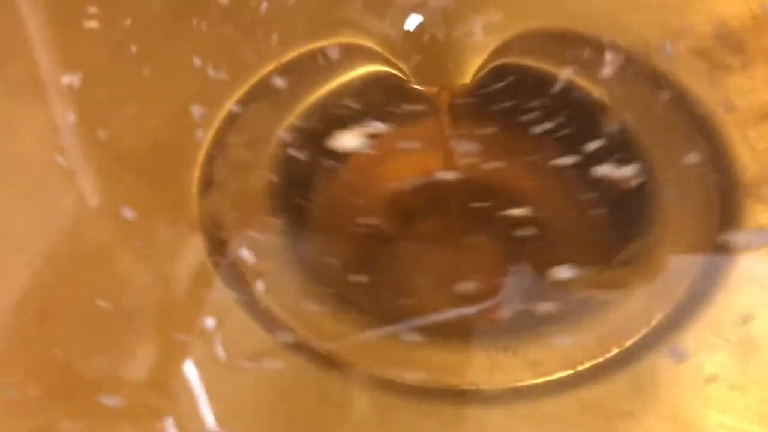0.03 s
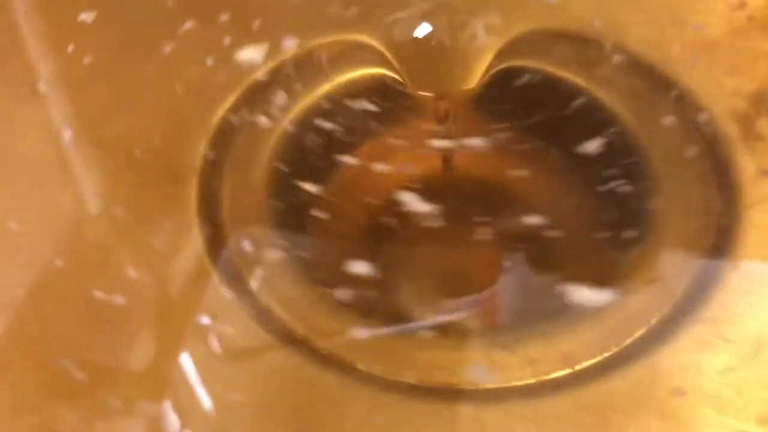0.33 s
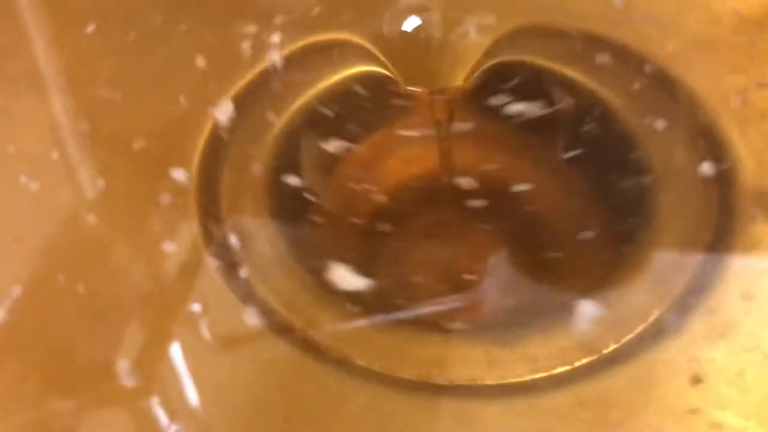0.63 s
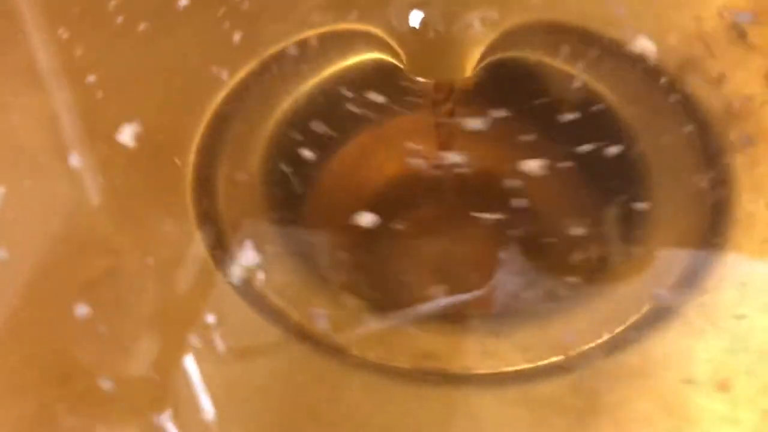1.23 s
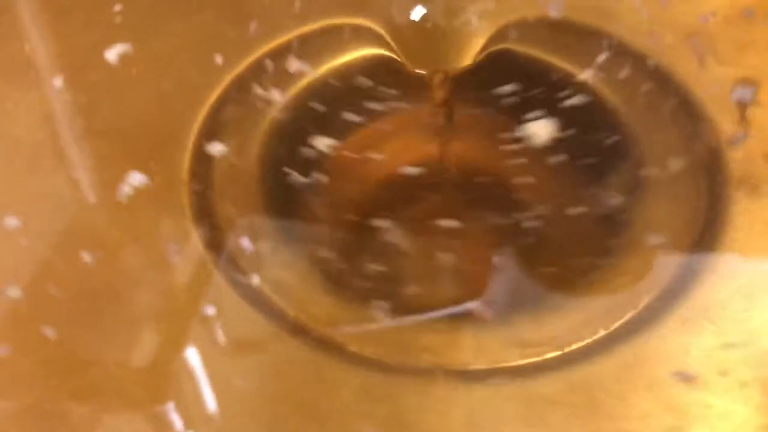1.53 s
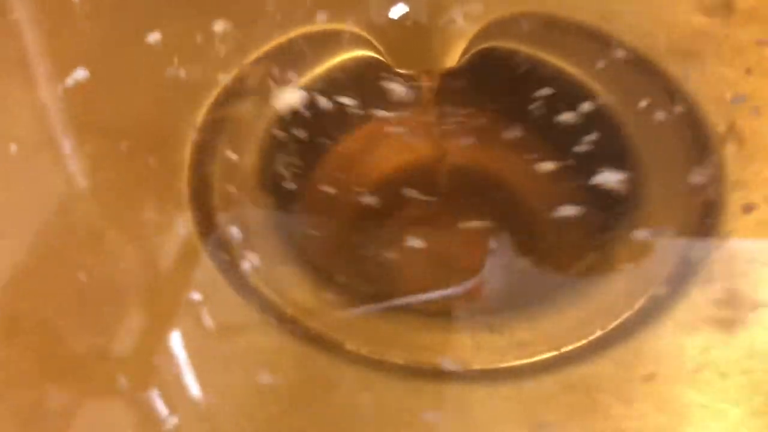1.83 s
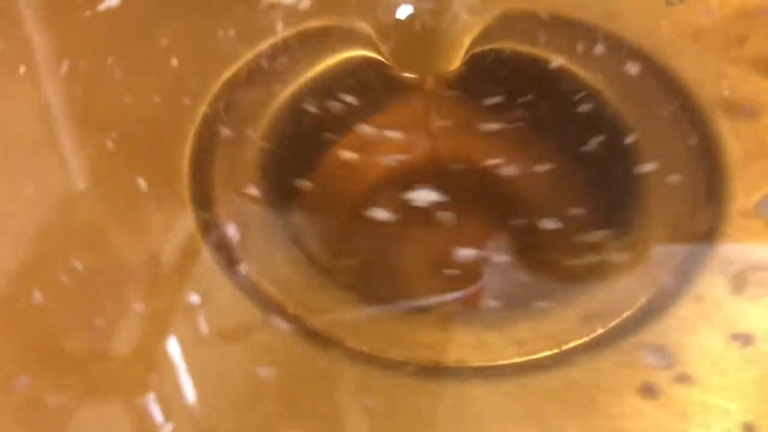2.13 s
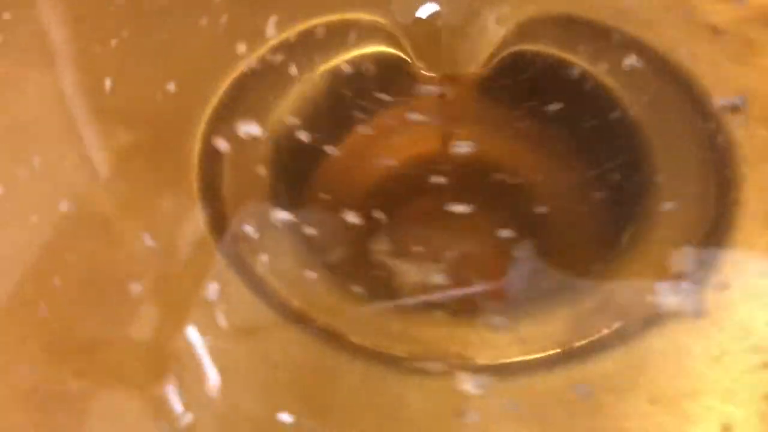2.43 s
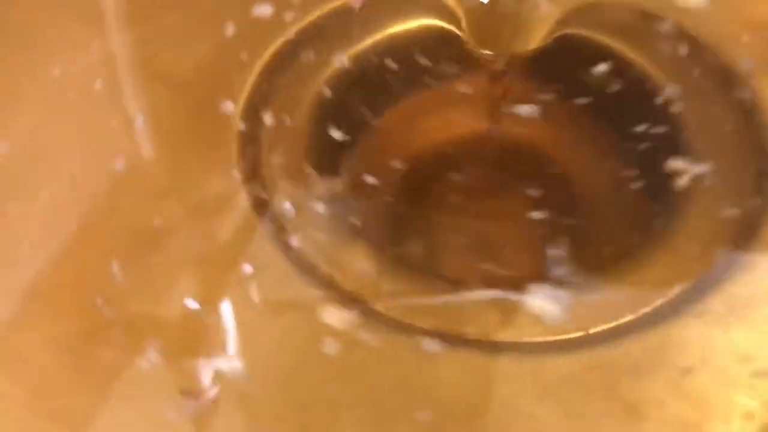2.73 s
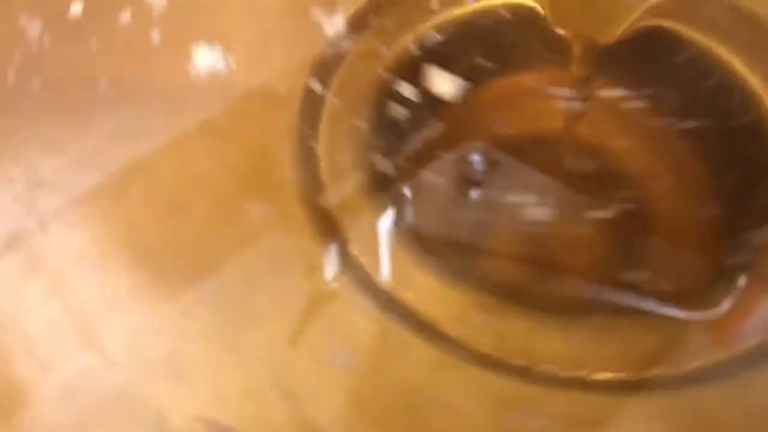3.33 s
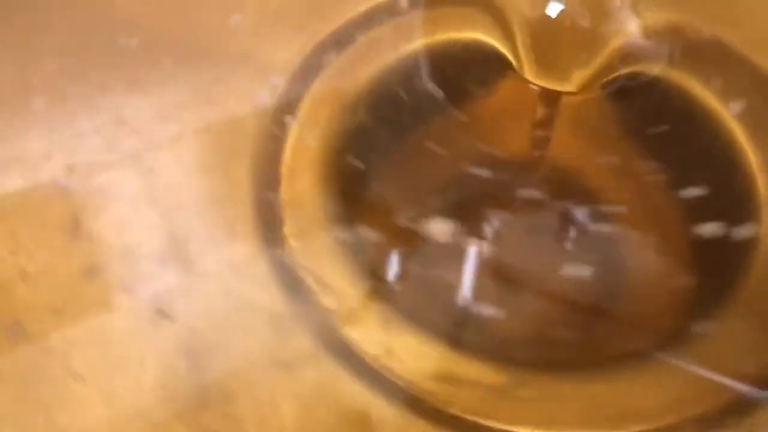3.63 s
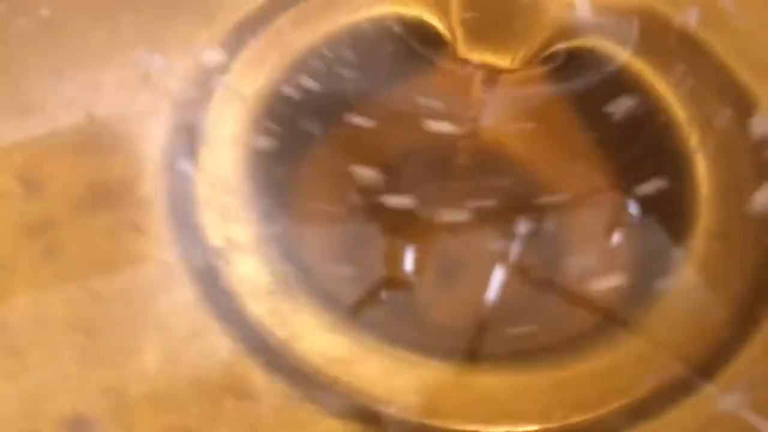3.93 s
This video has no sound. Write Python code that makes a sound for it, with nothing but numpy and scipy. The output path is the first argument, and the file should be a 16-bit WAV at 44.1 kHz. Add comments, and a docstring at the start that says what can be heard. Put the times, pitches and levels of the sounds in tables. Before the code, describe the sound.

Close to the microphone, water gurgles and hisses as it whirls down a sink drain over a low, pulsing hum and rumble. Bubbles blip, glug and sizzle, with two sharp pops in the second half and quick reflections from the basin.

```python
"""A swelling hum, a gurgle and a fizzing rush: water swirls down a basin's drain, close up in mono.
The air in the drain pipe hums over a low rumble, and collapsing air pockets ring the whirlpool's throat.
Bits of foam sizzle, single bubbles blip and glug, rising in pitch as they die,
and in the second half two bubbles snap sharply. The basin's walls add quick reflections."""
import sys
import numpy as np
from scipy import signal
from scipy.fft import rfft, irfft
from scipy.io import wavfile
from scipy.ndimage import uniform_filter1d

SR = 44100
rng = np.random.default_rng(int(sys.argv[2]) if len(sys.argv) > 2 else 0)


def inscribe(sig):
    """Save sig as 16-bit PCM at rate SR to the path in sys.argv[1].

    A 1-D sig is mono; a 2-D sig holds one channel per row.
    Samples are clipped to [-1, 1] before scaling.
    """
    pcm = np.round(np.clip(np.atleast_2d(sig).T, -1, 1) * 32767)
    wavfile.write(sys.argv[1], SR, pcm.astype(np.int16))


N = 176400
T = np.arange(N) / SR
HZ = np.maximum(np.fft.rfftfreq(N, 1 / SR), 1)


def from_db(db):
    """Decibels to gain."""
    return 10 ** (np.asarray(db) / 20)


def rms_one(x):
    """Scale to unit rms."""
    return x / np.sqrt(np.mean(x ** 2) + 1e-20)


def fader(points):
    """A level ride: straight lines between (t/s, level/dB) points, in dB at every sample."""
    return np.interp(T, *np.transpose(points))


def eq_curve(points):
    """Join (f/Hz, level/dB) points on a log-frequency axis, in dB at every bin."""
    hz, db = np.transpose(points)
    return np.interp(np.log(HZ), np.log(hz), db)


def shaped(x, gain):
    """Filter by a gain per frequency, then scale to unit rms."""
    return rms_one(irfft(rfft(x) * gain, N))


def drift(rate_hz):
    """A slow random wander of unit rms."""
    return shaped(rng.standard_normal(N), 1 / (1 + (HZ / rate_hz) ** 2))


def resonance(hz, width):
    """Response of one resonance, 1 at its peak."""
    return 1 / (1 + 1j * (HZ ** 2 - hz ** 2) / (HZ * width))


def grains(per_s, spread_db):
    """Random clicks of uneven size."""
    sizes = from_db(spread_db * np.minimum(rng.exponential(1, N), 4))
    return sizes * rng.choice([-1, 1], N) * (rng.random(N) < per_s / SR)


def cavity(modes, per_s, even, smooth_s):
    """Collapsing air pockets ring a cavity's modes; `even` (0 to 1) compresses the level."""
    ring = 0
    for hz, width, db in modes:
        ring += from_db(db) * shaped(grains(per_s, spread_db=2.5), resonance(hz, 1.48 * width) ** 2)
    power = uniform_filter1d(np.abs(signal.hilbert(ring)) ** 2, int(smooth_s * SR))
    return rms_one(ring / (power + 1e-3) ** (even / 2))


def basin(x, wet_db=3.5, t60_s=0.11):
    """Add quick, dense reflections from the walls of the basin."""
    t = T[:SR // 4]
    tail = rng.standard_normal(len(t)) * from_db(-60 * t / t60_s) * (t > .0015)
    return x + from_db(wet_db) * signal.fftconvolve(x, tail / np.linalg.norm(tail))[:N]


# swells of the pipe's hum: t/s, relative level/dB
HUM_LEVEL = [(0.0, -34), (0.07, -43.5), (0.37, -31.5), (0.41, -43), (0.46, -34.5), (0.53, -36), (0.57, -53),
             (0.71, -39), (0.73, -53.5), (0.96, -36), (1.01, -40), (1.15, -38.5), (1.34, -45), (1.38, -34),
             (1.5, -49), (1.57, -36), (1.69, -48), (1.77, -36.5), (1.83, -47), (1.87, -33), (2.13, -40),
             (2.15, -51), (2.23, -34.5), (2.26, -46), (2.35, -32), (2.43, -47), (2.46, -34), (2.49, -43),
             (2.54, -31), (2.61, -43.5), (2.73, -32.5), (2.87, -48.5), (2.96, -29), (3.03, -37),
             (3.05, -45.5), (3.29, -31), (3.35, -54), (3.43, -32), (3.53, -56), (3.55, -40), (3.69, -40.5),
             (3.75, -34.5), (3.97, -42), (4.0, -50)]
# weaker air resonances of the pipe: f/Hz, nominal width/Hz, relative level/dB
PIPE_MODES = [(304.8, 22.4, 0), (203.2, 35, -3)]
# spectrum of the falling water's rumble: f/Hz, relative level/dB
RUMBLE_EQ = [(20, -33), (40, -16), (52, -11), (64, 2), (85, -2), (110, 0), (125, -3), (145, 1.5), (160, -7),
             (175, 2), (200, -2.5), (225, -5.5), (260, -3), (320, -5.5), (345, -19), (380, -15.5),
             (430, -14), (480, -13.5), (520, -15), (570, -12), (620, -22), (700, -10.5), (1000, -32),
             (2000, -37)]

def pipe():
    """The air column hums on one wavering note; weaker resonances swell with it over a steady rumble."""
    level_db = fader(HUM_LEVEL)
    pitch_hz = 258.2 + 3.58 * drift(12.7)
    hum = from_db(level_db - 1) * np.sqrt(2) * np.sin(2 * np.pi * np.cumsum(pitch_hz) / SR)
    hollow_db = -46 + 0.66 * (level_db - level_db.mean())
    hollow = from_db(hollow_db) * cavity(PIPE_MODES, per_s=900, even=0.25, smooth_s=0.012)
    rumble = from_db(-41) * shaped(rng.standard_normal(N), from_db(eq_curve(RUMBLE_EQ)))
    return hum + hollow + rumble


# level rides of the throat, the rim and the drain's low ring: t/s, relative level/dB
THROAT_LEVEL = [(0.0, -46.5), (0.3, -43.5), (0.32, -37.5), (0.4, -41.5), (0.43, -33), (0.54, -39),
                (0.79, -43.5), (0.8, -37.5), (1.31, -39.5), (1.34, -49), (1.37, -31.5), (1.55, -43),
                (1.67, -43), (1.7, -35.5), (1.8, -40.5), (1.92, -38.5), (1.99, -45), (2.26, -38.5),
                (2.29, -47), (2.33, -39.5), (2.66, -44.5), (2.74, -34.5), (2.76, -46.5), (2.83, -30),
                (2.88, -41), (3.07, -39), (3.11, -52), (3.14, -36.5), (3.16, -46.5), (3.25, -35.5),
                (3.32, -48), (3.5, -42), (3.53, -48), (3.7, -37), (3.74, -44.5), (4.0, -48)]
SLOSH_LEVEL = [(0.0, -43), (0.1, -46), (0.6, -52), (0.62, -58.5), (1.57, -43.5), (1.64, -50.5),
               (2.12, -44.5), (2.17, -44), (2.24, -48.5), (3.5, -44.5), (3.59, -53), (3.9, -39.5),
               (3.92, -47), (4.0, -47)]
LOW_RING_LEVEL = [(0.0, -52), (0.41, -49.5), (0.44, -39), (0.47, -53.5), (2.39, -60), (2.73, -49.5),
                  (2.87, -71), (2.94, -56), (4.0, -58.5)]
# resonances of the throat and the rim: f/Hz, nominal width/Hz, relative level/dB
THROAT_MODES = [(714, 45, -15.5), (788, 31, -8.5), (843.2, 40, 1.5), (927.5, 57, -5.5)]
SLOSH_MODES = [(1087, 36, -4.5), (1185, 45, -2.5), (1314, 114, -1.5), (1475, 25, -7), (1692, 53, -6),
               (1816, 110, -6)]

def gurgle():
    """Small glugs ring the whirlpool's throat and the drain below it; water sloshes around the rim."""
    throat = cavity(THROAT_MODES, per_s=500, even=0.29, smooth_s=0.047)
    slosh = cavity(SLOSH_MODES, per_s=650, even=0.23, smooth_s=0.094)
    low_ring = cavity([(481, 39, 0)], per_s=500, even=0.26, smooth_s=0.059)
    return (from_db(fader(THROAT_LEVEL) - 0.5) * throat
            + from_db(fader(SLOSH_LEVEL) - 1.5) * slosh
            + from_db(fader(LOW_RING_LEVEL) - 1) * low_ring)


# level ride of the rushing water: t/s, relative level/dB
RUSH_LEVEL = [(0.0, -42.5), (1.12, -43.5), (1.4, -45), (1.8, -43), (2.07, -44.5), (2.61, -43.5),
              (3.05, -43.5), (3.17, -42), (3.35, -43.5), (4.0, -44)]
# broad tone of the rush: f/Hz, relative level/dB
RUSH_EQ = [(400, -30), (700, -10), (1100, -2.5), (1450, -6), (1550, -7), (1750, -5.5), (2100, -2),
           (2400, -4), (3400, -0.5), (4200, -4.5), (6000, -5.5), (8500, -11), (10000, -13), (12500, -15.5),
           (16000, -15)]
# resonances of the basin's hollow: f/Hz, width/Hz, boost/dB
BASIN_MODES = [(1240, 67, 7), (1466, 14.4, 14.5), (1670, 40, 3.5), (2132, 22, 7), (2250, 48, 6.5),
               (2765, 14, 15.5), (3104, 15, 8.5), (3560, 260, 3.5), (4470, 170, 4.5), (5420, 280, 0),
               (8150, 250, 2.5), (11300, 570, 1)]

def rush(fizz_per_s=1800, flutter_db=1.85):
    """Swirling water: equal parts fluttering hiss and fizz of tiny bubbles, coloured by the basin."""
    hiss, fizz = 0, 0
    shared_drift = drift(6.5)
    bands_hz = np.geomspace(900, 15000, 15)
    for hz in bands_hz:
        gain = np.sqrt(hz) * from_db(flutter_db * (0.33 * shared_drift + drift(5.3)))
        hiss += gain * shaped(rng.standard_normal(N), resonance(hz, 0.42 * hz) ** 2)
        pops = grains(fizz_per_s / len(bands_hz), spread_db=4.0)
        fizz += gain * shaped(pops, resonance(hz, 0.11 * hz))
    water = rms_one(hiss) + rms_one(basin(fizz))
    boost_db = sum(db * np.abs(resonance(hz, width)) ** 2 for hz, width, db in BASIN_MODES)
    return from_db(fader(RUSH_LEVEL) + 1) * shaped(water, from_db(eq_curve(RUSH_EQ) + boost_db))


def plinks(per_s=130, low_hz=2008, high_hz=11060):
    """Faint bubbles born at random in the swirl, as rows of t/s, f/Hz, level/dB."""
    when, height, size_rank = rng.random((int(per_s * N / SR), 3)).T
    octaves = height * np.log2(high_hz / low_hz)
    db = -46 + 0.5 * octaves - 3 * np.log(np.maximum(size_rank, .04))   # a few stand out
    return np.transpose([when * N / SR, low_hz * 2 ** octaves, db])


# sizzles of bursting foam: t/s, length/s, f/Hz, relative level/dB
SIZZLES = [(.01, .03, 7700, -46), (0.103, 0.028, 8300, -44), (0.108, .03, 13800, -48),
           (0.228, .07, 2850, -41), (0.273, 0.03, 8400, -40.5), (0.271, 0.014, 11400, -44),
           (0.457, 0.043, 8700, -47), (0.579, 0.018, 9500, -47), (.806, .022, 10950, -40),
           (0.809, 0.017, 8240, -38), (0.911, 0.014, 8300, -42.5), (1.48, .017, 11300, -44.5),
           (1.481, 0.013, 8400, -42), (1.588, 0.032, 7600, -46.5), (1.85, 0.014, 12500, -52),
           (2.19, 0.082, 4700, -45.5), (3.075, 0.034, 6360, -43), (3.732, 0.041, 7950, -45),
           (3.743, .03, 12900, -48), (3.842, .075, 1650, -40)]

def sizzles(pops_per_s=1300, q=23, attack_s=0.0012, decay_s=0.0017):
    """Patches of foam burst in short showers of tiny ringing bubbles of similar size."""
    out, t = np.zeros(N + SR), T[:SR // 10]
    for onset, length, hz, db in SIZZLES:
        shower = 0
        pitches = hz * np.exp(.06 * np.linspace(-1, 1, 5))
        for pitch in pitches:
            pops = rng.standard_normal(len(t)) * (rng.random(len(t)) < pops_per_s / len(pitches) / SR)
            shower += signal.lfilter(*signal.iirpeak(pitch, q, fs=SR), pops + 1e-18)
        envelope = np.clip(t / attack_s, 0, 1) * np.exp(-np.maximum(t - length, 0) / decay_s)
        start = int(onset * SR)
        out[start:start + len(t)] += from_db(db - 4) * envelope * rms_one(shower)
    return out[:N]


# bright single bubbles, and deeper glugs in the throat: t/s, starting f/Hz, relative level/dB
BLIPS = [(.224, 2290, -25.5), (.274, 3220, -22), (.32, 5250, -37), (1.211, 2870, -26), (1.331, 2000, -25),
         (1.713, 5330, -27), (1.797, 2080, -25.5), (1.832, 2960, -31), (1.886, 5560, -27),
         (2.136, 2300, -31.5), (2.168, 1190, -31.5), (2.298, 2700, -18.5), (2.299, 2300, -27),
         (2.628, 3360, -25), (2.664, 2110, -32), (2.688, 2100, -29), (2.70, 3110, -22), (2.793, 3850, -27),
         (3.116, 2040, -29), (3.18, 5200, -27), (3.304, 2170, -30), (3.357, 2100, -28),
         (3.428, 2060, -30.5), (3.548, 1940, -30), (3.603, 3330, -26.5), (3.718, 2100, -28.5),
         (3.732, 4670, -22.5), (3.751, 2030, -24), (3.836, 1900, -27), (3.9, 1700, -41)]
GLUGS = [(.318, 840, -44), (.425, 800, -28), (.803, 897, -30), (.925, 874, -27), (1.10, 925, -27),
         (1.370, 886, -19.5), (1.699, 830, -25), (1.726, 800, -28), (2.812, 816, -39), (3.137, 845, -43),
         (3.235, 850, -32)]

def bubbles(rows, cycles, chirp, attack_s):
    """Each bubble rings and bends up in pitch, fading by 60 dB over about `cycles` periods."""
    out, t = np.zeros(N + SR), T[:SR // 10]
    for onset, hz, db in rows:
        start, t60 = int(onset * SR), cycles / hz
        envelope = (1 - np.exp(-t / attack_s)) * from_db(db - 60 * t / t60)
        out[start:start + len(t)] += envelope * np.sin(2 * np.pi * hz * t * (1 + chirp * t / t60))
    return out[:N]


# bubbles that snap sharply: t/s, relative level/dB
SNAPS = [(2.4426, -14.5), (2.7305, -22.5)]
# modes of a snap: f/Hz, relative level/dB, t60/s
SNAP_MODES = [(1700, -13, .006), (2680, -5.5, 0.011), (3560, -2, 0.015), (4330, -4, 0.0036),
              (5140, -5, 0.0088), (6300, -4.5, 0.0046), (8850, -4.5, 0.0028), (11200, -13, 0.0028),
              (14000, -20, .0015)]

def snaps(low_cut_hz=1200):
    """A bubble bursts hard at the surface: a bright crack with almost no ring."""
    out = 0
    for onset, snap_db in SNAPS:
        t = np.clip(T - onset, 0, .1)
        for k, (hz, db, t60) in enumerate(SNAP_MODES):
            out += (-1) ** k * from_db(snap_db + db - 60 * t / t60) * np.sin(2 * np.pi * hz * t)
    return signal.sosfilt(signal.butter(2, low_cut_hz, "high", fs=SR, output="sos"), out + 1e-18)


def scene():
    """A bed of hum, gurgle and rush with bubbles on top, alike in both channels."""
    blips = from_db(-0.5) * bubbles([*BLIPS, *plinks()], cycles=36, chirp=0.083, attack_s=0.00089)
    glugs = bubbles(GLUGS, cycles=53, chirp=0.068, attack_s=0.00041)
    bed = pipe() + gurgle() + rush()
    mono = bed + glugs + basin(blips) + basin(sizzles() + snaps(), wet_db=-5)   # surface bursts sit drier
    return np.array([mono, mono])


def record(dry, cutoff_hz=15850):
    """A steep high cut takes off the very top."""
    high_cut = signal.firwin(601, cutoff_hz, fs=SR, window="blackman")
    return signal.fftconvolve(dry, high_cut[None], "same", axes=1)


dry = scene()
out = record(dry)
inscribe(out)
```